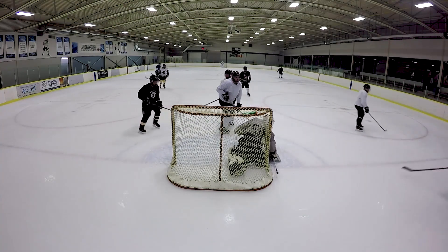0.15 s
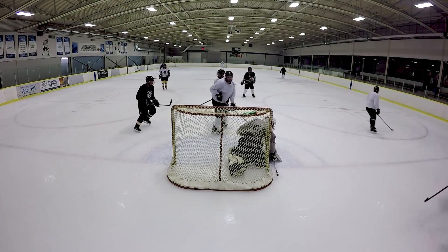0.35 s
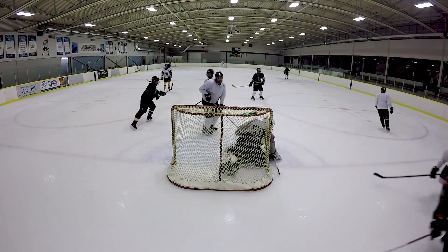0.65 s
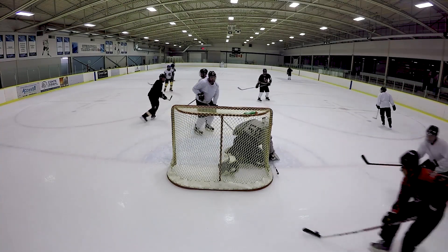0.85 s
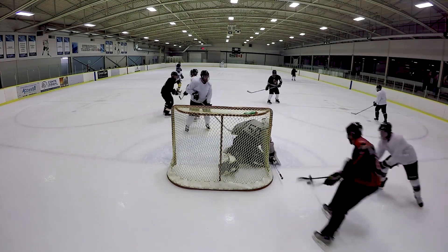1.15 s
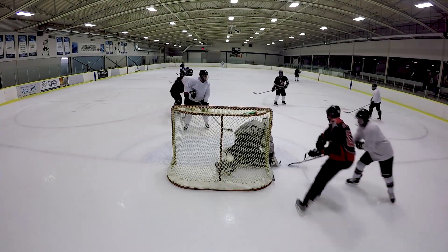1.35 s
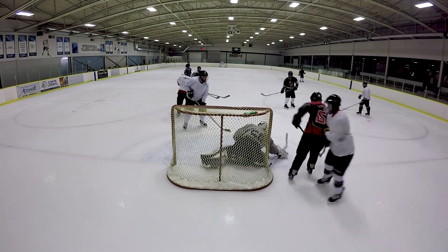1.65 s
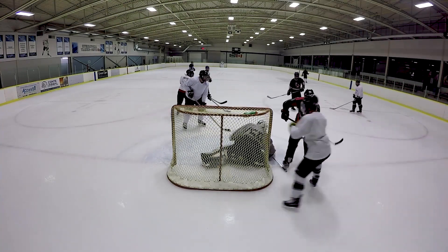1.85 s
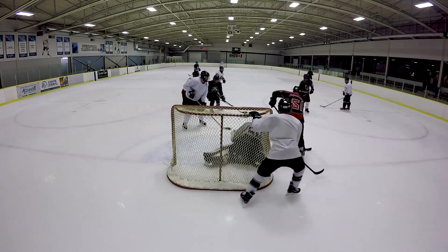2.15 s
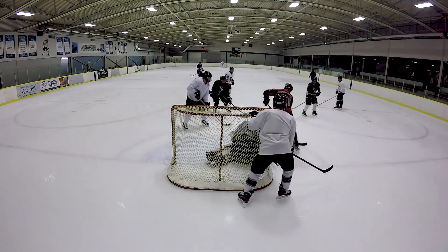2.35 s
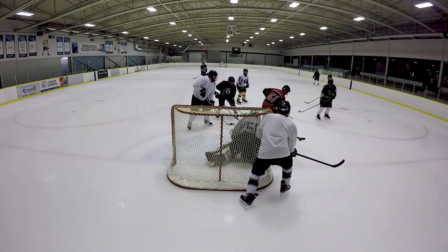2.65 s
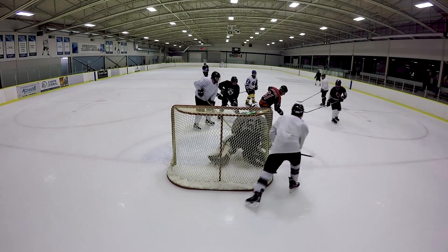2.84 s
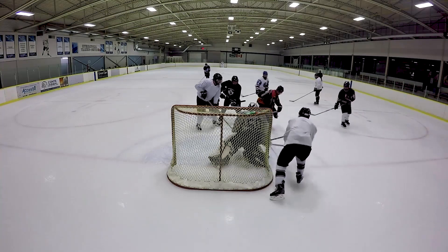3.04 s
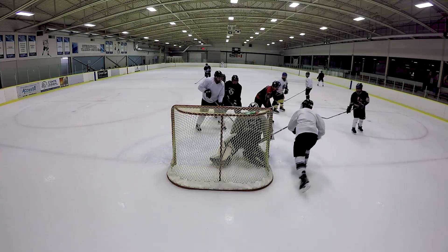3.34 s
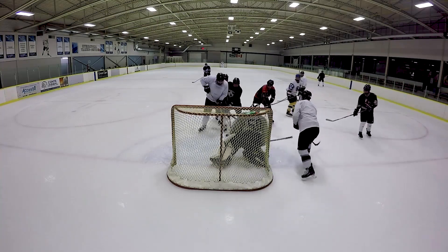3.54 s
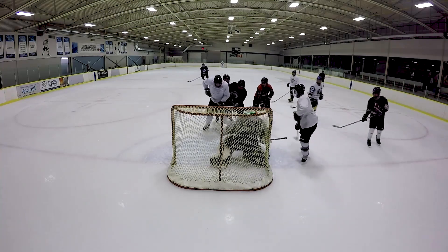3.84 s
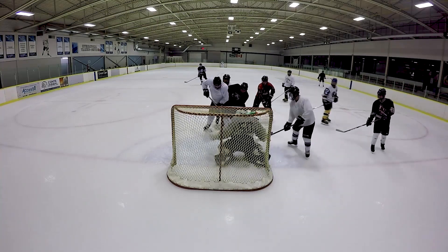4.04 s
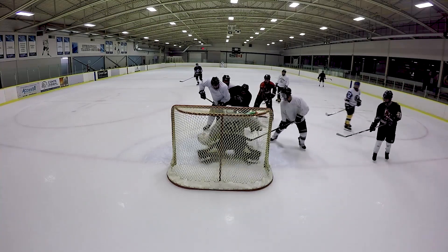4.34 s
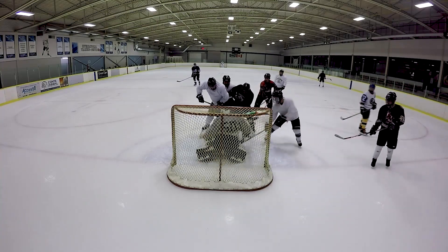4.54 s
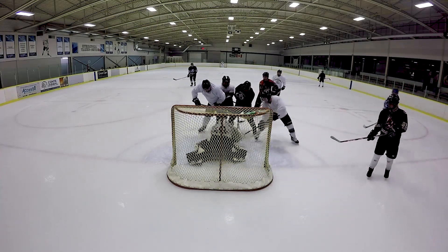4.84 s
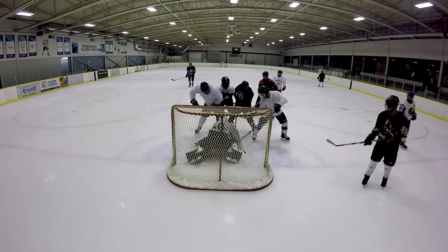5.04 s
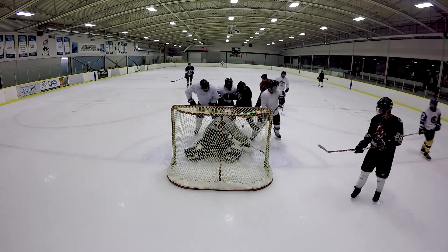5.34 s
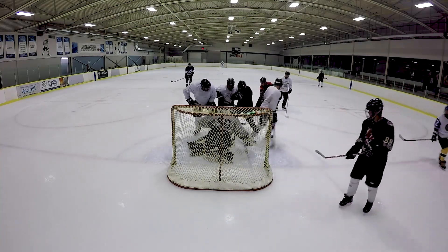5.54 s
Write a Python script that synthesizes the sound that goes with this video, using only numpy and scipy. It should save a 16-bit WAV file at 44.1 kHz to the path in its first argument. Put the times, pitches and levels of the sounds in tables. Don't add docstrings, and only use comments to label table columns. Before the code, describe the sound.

An indoor rink with a low steady ventilation rumble, heard through a small closed case that gives a boxy, nasal colour. From 0 s, blades scrape and hiss on ice, with a solid knock at 0.3 and lighter ones near 0.5. Between 0.6 and 1.2 skaters pass very close: gritty carving, bright snow spray, a low boom in the boards. At 1.2 a stick trails briefly, then a hard dry shot cracks, the loudest event, with a faint buzzing glass tail and hall echo. A sharp stick-on-post clack hits at 1.7, with flat knocks at 1.95 and 2.1 and a tap at 2.25. Close carving fades after about 2.2. A hollow pad chatters at 2.7-2.85; crisp taps follow at 3.0-3.1, rattling knocks at 3.6 and 3.9-4.0. Irregular clacks cluster from 4.1 to 4.6, a drag and soft thumps at 4.8-4.9, then sparse knocks until 5.6 over faint distant skating.

```python
import sys
import numpy as np
from scipy import signal
from scipy.fft import rfft, irfft
from scipy.io import wavfile
from scipy.ndimage import uniform_filter1d

SR = 44100
rng = np.random.default_rng(int(sys.argv[2]) if len(sys.argv) > 2 else 0)


def nominal_scale(level):
    x = np.asarray(level, float) / 20
    return 10 ** x


def generate_wav(sig):
    pcm = np.round(np.clip(np.atleast_2d(sig).T, -1, 1) * 32767).astype(np.int16)
    wavfile.write(sys.argv[1], SR, pcm)


N = 250929

# (frequency [Hz], level [dB per Hz])
PLANT_SPECTRUM = [(7.1, -39), (12, -1), (44, 1), (189, -7.5), (229, -6), (273, -10), (400, -10),
                  (520, -14.5), (880, -120)]
# (time [s], half-width [s], level [dB])
BOARD_BOOM = (0.98, 0.28, 5.7)
RUMBLE_DB, SWAY_DB = -53.5, 1.6
WEIGHT_SHARE = 0.057

# (frequency [Hz], width [Hz], level [dB])
CASE_RESONANCES = [(1036, 95, -9.5), (1680, 340, -4.5), (2560, 444, -1.5), (3435, 340, -6), (3910, 100, -4),
                   (4840, 230, -12.5), (5350, 200, -12), (7460, 14, -38)]
# (frequency [Hz], level [dB])
CASE_LEAK = [(100, -20.5), (300, -17.5), (700, -17.5), (1250, -4.5), (2100, -3), (3050, -23), (4200, -8.5),
             (5500, -13), (7500, -16.5), (11000, -30), (15000, -35.5)]
# (frequency [Hz], width [Hz], level [dB])
CASE_NOTCHES = [(1184, 246, -6), (1814, 167, -5.5), (3156, 280, -2.5), (4152, 540, -6.5), (4950, 170, -2),
                (7730, 2200, -3.5), (12100, 2600, 5.5)]
# (frequency [Hz], time to fall 60 dB [s])
RINK_DECAY = [(200, 1.9), (600, 2.4), (1000, 0.23), (2500, 1.75), (6000, 1.4), (14000, 0.4)]
# (delay [s], level [dB])
RINK_ECHOES = [(.0035, -12.5), (.008, -14), (.024, -14.5), (.038, -12), (.09, -36), (.14, -35)]

# (time [s], level [dB])
FAR_PLAY = [(0.0, -32.5), (0.25, -37.5), (1.12, -35), (1.33, -30.5), (1.5, -36), (1.74, -31.5),
            (1.87, -34.5), (2.26, -34.5), (2.44, -41.5), (3.06, -36), (3.5, -43.5), (3.64, -37.5),
            (3.84, -42.5), (3.98, -36), (4.56, -37.5), (4.72, -38.5), (5.52, -45), (5.69, -40.5)]
# (start [s], push [s], snow level [dB], grind level [dB], hiss pitch [Hz])
NEAR_STRIDES = [(0.0, 0.11, -61.5, -44, 10400), (0.4, 0.16, -69, -40.5, 10200),
                (0.64, .32, -46.5, -38, 11000), (0.95, 0.36, -51, -42.5, 9500),
                (1.24, 0.11, -46.5, -40, 10400), (1.82, 0.21, -47, -45, 11300),
                (1.93, 0.26, -50, -40.5, 11150), (2.62, 0.32, -57, -60, 10140),
                (2.94, 0.13, -51.5, -52, 9900), (3.06, .12, -62, -42, 10100), (3.5, 0.29, -64.5, -62, 9850),
                (4.15, 0.3, -61, -56, 10400), (4.76, 0.15, -69, -41.5, 9990), (5.0, 0.058, -81, -41, 9800),
                (5.52, .2, -61, -54, 9700)]
# (level [dB], share [dB per dB])
IDLE_LAYERS = [
    (-52, 0.49),
    (-67.5, 0.29),
    (-49, 0.51),
]
DIG_S, LIFT_DB_PER_S = 0.19, 100
SAG_HZ_PER_S = 4200
USUAL_DB, NEAREST_DB = -38, -46
SPRAY_DB, SPRAY_SHARE = -40, 0.53
CARVE_DB, CARVE_SHARE = -47, 1

# (time [s], level [dB], frequency [Hz], width [Hz], 60 dB decay [s])
GLASS_BUZZ = (1.29, -30, 2480, 260, 1.5)
# (time [s], peak [dB], pitch [Hz])
PAD_BUMPS = [(0.208, -47, 1060), (2.414, -50, 1000), (2.72, -32, 935), (2.755, -31, 910), (2.786, -26, 940),
             (2.819, -33.5, 875), (2.849, -34, 860), (2.966, -39, 515), (4.259, -38, 980),
             (4.676, -33.5, 1060), (4.812, -33, 700), (3.637, -35, 820), (4.925, -36.5, 667),
             (3.109, -33, 1010)]
# (time [s], peak [dB], pitch [Hz])
BOARD_THUMPS = [(0.87, -46, 35.8), (0.92, -46, 45), (1.223, -38, 48), (1.221, -41, 174), (1.224, -27, 427),
                (3.11, -32, 277), (4.592, -46, 71), (4.811, -38, 453), (4.908, -40.5, 79.8),
                (4.924, -40, 152), (4.927, -31, 390), (4.959, -44, 120), (4.972, -42, 480),
                (4.768, -40, 334)]
# (time [s], peak [dB], pitch [Hz], length [cycles])
POST_CLANG = (1.7183, -6.5, 2200, 6.5)

# (time [s], knock peak [dB], knock
# pitch [Hz], tick level [dB], thud level [dB])
STICK_DRAGS = [(0.9393, -46, 1460, -42, -30), (1.2583, -25, 2530, -52, -41),
               (1.7444, -24, 2480, -33.5, -52), (2.2661, -31, 1740, -33, -49),
               (2.4277, -30, 2460, -42.5, -49), (2.8354, -27, 2630, -55, -44),
               (2.8754, -42, 2360, -61, -49), (4.8135, -24, 3300, -44, -30.5),
               (4.8313, -24, 2410, -47, -55), (4.8462, -26, 2500, -47, -67),
               (5.6397, -29.5, 2800, -52, -35)]
# (time [s], knock peak [dB], knock pitch [Hz], tick level [dB], length [ms])
LIGHT_TAPS = [(0.4512, -33, 2280, -49, 3.4), (0.8603, -23, 2740, -32, 12), (2.2391, -16, 2820, -25, 3.5),
              (2.4515, -23, 2560, -38.5, 6.4), (2.9914, -19.5, 2280, -37, 2.7),
              (3.0313, -11, 2360, -33, 0.59), (3.114, -14, 2500, -36.5, 4.9), (3.512, -32, 1540, -42, 5.3),
              (3.6704, -22, 1640, -46, 9.8), (3.9434, -23, 2500, -50, 8.2), (3.9558, -20, 2500, -39, 5.3),
              (3.9905, -25, 2340, -45, 6), (4.0028, -19.5, 2400, -41, 7.8), (4.4464, -21, 2360, -39, 3.7),
              (4.526, -26, 2460, -53, 3.7), (4.6242, -14, 2370, -36.5, 5.2),
              (4.6756, -29, 1590, -46.5, 3.2), (4.768, -31, 2180, -44, 4.4)]
# (time [s],
# knock peak [dB], knock pitch [Hz], thud level [dB], length [ms])
SHAFT_KNOCKS = [(1.246, -11.5, 2560, -32, 5.2), (1.7187, -10.5, 2600, -27.5, 4.6),
                (1.952, -19, 2550, -44, 7.7), (2.1269, -17.5, 2370, -29, 3.05),
                (3.635, -18, 1810, -42, 7.5), (3.9219, -19, 2000, -31.5, 10), (3.972, -21, 2060, -31.5, 12)]
# (time [s], knock peak [dB], knock
# pitch [Hz], tick level [dB], thud level [dB])
FULL_HITS = [(0.2709, -17.5, 2210, -49, -22), (0.3078, -48, 2480, -50, -32.5),
             (0.4662, -24, 1660, -48, -31), (1.1668, -20, 2460, -35, -25.5),
             (1.2293, -15, 2656, -43, -16.5), (1.6752, -26, 1610, -27.5, -25.5),
             (1.6873, -22, 2500, -34, -28.5), (3.108, -38, 1389, -47, -22.5),
             (4.1087, -17.5, 1790, -72, -25), (4.4129, -16.5, 2200, -76, -34),
             (4.5047, -19, 2580, -31, -28.5), (4.578, -16, 2700, -62, -28), (4.596, -48, 2450, -45, -29),
             (5.0552, -27.5, 2560, -44.5, -44), (5.463, -30, 2540, -49, -37), (5.5988, -18, 1680, -67, -30),
             (5.614, -44, 1520, -47, -47)]
# (time [s], knock peak [dB], knock pitch [Hz], tick level [dB], length [ms])
HARD_SHOT = [
    (1.1843, -27, 2430, -41, 2.4),
    (1.191, -21, 1920, -48, 2.5),
    (1.2223, 0, 2660, -62, 1.24),
    (1.2239, -1.5, 2700, -14.5, 4.8),
]
BLOW_MS, BLOW_HZ, DRAG_MS = 8.7, 2400, 13
TAP_THUD_DB, SHOT_THUD_DB, KNOCK_TICK_DB = -24, -18, -22.5
SHARP, FLAT, SOFT, HARD = 13, 3, 0.3, 6

HISS_DB = -65.5
KNEE = 4
EDGE_HZ = 15290


def evened(x):
    return x / np.sqrt(np.mean(x ** 2) + 1e-20)


def peaked(x):
    return x / (abs(x).max() + 1e-12)


def read(points, hz):
    f, value = np.transpose(points)
    return np.interp(np.log(hz + 1), np.log(f + 1), value)


def along(rows):
    s, *columns = np.transpose(rows)
    return [np.interp(np.arange(N) / SR, s, c) for c in columns]


def add(mix, s, sound):
    part = mix[round(s * SR):][:len(sound)]
    part += sound[:len(part)]


def band(x, lo_hz, hi_hz):
    edges = [max(lo_hz, 10), min(hi_hz, 0.45 * SR)]
    return signal.sosfilt(signal.butter(2, edges, "band", fs=SR, output="sos"), x)


def resonate(x, hz, width_hz):
    turn = np.exp(2j * np.pi * np.cumsum(hz * np.ones(len(x))) / SR)
    r = np.exp(-np.pi * width_hz / SR)
    return 2 * (turn * signal.lfilter([1 - r], [1, -r], x / turn)).real


def wander(hz):
    step = max(int(SR / hz), 1)
    slow = uniform_filter1d(rng.standard_normal(N), step)
    return evened(uniform_filter1d(slow, step))


def causal(gain):
    log_gain = np.log(np.r_[gain, gain[-2:0:-1]] + 1e-5)
    spectrum = np.exp(np.conj(signal.hilbert(log_gain)))
    return np.fft.ifft(spectrum).real[:len(gain) // 2]


def camera_case():
    hz = np.fft.rfftfreq(4096, 1 / SR)
    power = nominal_scale(read(CASE_LEAK, hz)) ** 2
    for centre, width, db in CASE_RESONANCES:
        power = power + nominal_scale(db) ** 2 / (1 + (2 * (hz - centre) / width) ** 4)
    notch_db = sum(db * np.exp(-(2 * (hz - centre) / width) ** 2) for centre, width, db in CASE_NOTCHES)
    return causal(np.sqrt(power) * nominal_scale(notch_db))


def rink(x):
    taps = rng.choice([-1., 1.], 2 * SR) * (rng.random(2 * SR) < 2500 / SR)
    hz, t, z = signal.stft(taps, SR, nperseg=256)
    decay = nominal_scale(-60 * t / read(RINK_DECAY, hz)[:, None])
    build_up = np.clip(t / 0.013, 0, 1)
    tail = signal.istft(z * decay * build_up, SR, nperseg=256)[1]
    tail = nominal_scale(-8.0) * tail / np.linalg.norm(tail)
    for s, db in RINK_ECHOES:
        add(tail, s, np.array([nominal_scale(db)]))
    return band(signal.fftconvolve(x, tail)[:N], 1200, 27000)


def plant():
    z = rfft(rng.standard_normal(N)) * nominal_scale(read(PLANT_SPECTRUM, np.fft.rfftfreq(N, 1 / SR)))
    grind_db = blade_levels()[3]
    weight_db = WEIGHT_SHARE * (grind_db - NEAREST_DB) + SWAY_DB * wander(1.5)
    s, width, db = BOARD_BOOM
    weight_db = weight_db + db * np.exp(-((np.arange(N) / SR - s) / width) ** 2)
    return nominal_scale(RUMBLE_DB + weight_db) * evened(irfft(z, N))


def strides(levels_db, idle_db):
    t, power = np.arange(N) / SR, nominal_scale(idle_db) ** 2
    for (s, push, *_), db in zip(NEAR_STRIDES, levels_db):
        dig = np.clip((t - s) / DIG_S + (s <= 0), 0, 1)
        lift_db = LIFT_DB_PER_S * np.maximum(t - s - push, 0)
        power = power + (dig * nominal_scale(db - lift_db)) ** 2
    return 10 * np.log10(power)


def blade_levels():
    play = along(FAR_PLAY)[0]
    _, _, snow, grind, _ = np.transpose(NEAR_STRIDES)
    spray_db, snow_db, grind_db = (db + share * (play - USUAL_DB) for db, share in IDLE_LAYERS)
    nearness_db = snow - NEAREST_DB
    return (strides(CARVE_DB + CARVE_SHARE * nearness_db, play),
            strides(SPRAY_DB + SPRAY_SHARE * nearness_db, spray_db),
            strides(snow, snow_db), strides(grind, grind_db))


def slide():
    s, push, _, _, hz = np.transpose(NEAR_STRIDES)
    t = np.arange(N) / SR
    latest = np.maximum(np.searchsorted(s, t, side="right") - 1, 0)
    return hz[latest] - SAG_HZ_PER_S * np.clip(t - s[latest], 0, push[latest])


def swish(x, width_hz, lift_db):
    return x + nominal_scale(lift_db) * resonate(x, slide(), width_hz)


def chips(per_s, spread_db, share, shake_db, shake_hz):
    size = nominal_scale(spread_db * np.minimum(rng.exponential(1, N), 4)) * rng.choice([-1., 1.], N)
    share = np.clip(share, 0, 1)
    breaking = evened(size * (rng.random(N) < per_s / SR))
    grit = share * breaking + (1 - share) * rng.standard_normal(N)
    return grit * nominal_scale(shake_db * wander(shake_hz))


def blades(case):
    carve_db, spray_db, snow_db, grind_db = blade_levels()
    carve = band(chips(1500, 5.2, 0.18, 1.55, 74), 1200, 3490)
    spray = band(chips(3000, 1.0, 0.11, 2.1, 51), 2700, 9700)
    spray = spray + 0.27 * resonate(spray, slide() / 2, 240)
    snow = swish(band(chips(3000, 3.5, 0.36, 1.4, 50), 7800, 17000), 800, 6)
    grind = band(chips(400, 1.6, 0.46, 1.7, 22), 314, 1194)
    grind = grind + 0.52 * resonate(grind, 1097, 330)
    layers = ((carve, carve_db - 0.7), (spray, spray_db + 0.1), (snow, snow_db + 0.09), (grind, grind_db + 0.23))
    return sum(nominal_scale(db) * evened(signal.oaconvolve(x, case)[:N]) for x, db in layers)


def pane(s, db, hz, width_hz, t60):
    t = np.arange(SR) / SR
    buzz = resonate(rng.standard_normal(SR), hz, width_hz)
    buzz = resonate(buzz, hz, width_hz)
    return s, nominal_scale(db - 60 * t / t60) * np.minimum(t / 0.0088, 1) * evened(buzz)


def bump(row, turns, lift_db):
    s, db, hz = row
    cycles = np.arange(3000) / SR * hz
    swell = cycles * np.exp(-(cycles / turns) ** 2)
    return s, nominal_scale(db + lift_db) * peaked(np.sin(2 * np.pi * cycles) * swell)


def hit(row, chance, case, crack):
    s, knock_db, hz, tick_db, thud_db, ms = row
    t = np.arange(len(chance)) / SR
    u = t / (max(ms, 0.5) / 1000)
    contact = chance * np.minimum(t / 0.00068, 1) * np.exp(-1.6 * u ** 1.7)
    contact = contact + crack * signal.unit_impulse(len(t), idx=12)
    knock = band(contact, 0.84 * hz, 1.143 * hz)
    knock = knock + 0.73 * band(band(contact, 650, 4430), 590, 5030)
    top_hz = np.clip(9000 * nominal_scale(0.5 * (tick_db - knock_db + 24.5)), 6000, 19000)
    tick = band(contact * np.exp(-0.8 * u), 4190, top_hz)
    thud = band(contact, 367, 1320)
    parts = ((knock, knock_db + 3.0), (tick, tick_db + 12.0), (thud, thud_db + 8.5))
    return s, sum(nominal_scale(db) * peaked(signal.fftconvolve(x, case)[:len(t)]) for x, db in parts)


def blows():
    full = [((*row, BLOW_MS * BLOW_HZ / row[2]), SHARP) for row in FULL_HITS]
    full += [((s, db, hz, tick, db + TAP_THUD_DB, ms), SHARP) for s, db, hz, tick, ms in LIGHT_TAPS]
    full += [((s, db, hz, db + KNOCK_TICK_DB, thud, ms), FLAT) for s, db, hz, thud, ms in SHAFT_KNOCKS]
    full += [((*row, DRAG_MS), SOFT) for row in STICK_DRAGS]
    full += [((s, db, hz, tick, db + SHOT_THUD_DB, ms), HARD) for s, db, hz, tick, ms in HARD_SHOT]
    return full


def scene():
    case, play, rows = camera_case(), np.zeros(N), blows()
    near = blades(case) + plant()
    add(near, *pane(*GLASS_BUZZ))
    for row in BOARD_THUMPS:
        add(near, *bump(row, 0.52, 3.5))
    add(near, *bump(POST_CLANG[:3], POST_CLANG[-1], 0))
    for row in PAD_BUMPS:
        add(play, *bump(row, 2.5, 1.2))
    for (row, crack), chance in zip(rows, rng.standard_normal((len(rows), 2000))):
        add(play, *hit(row, chance, case, crack))
    return (near + play + rink(play))[None]


def low_pass(x):
    return signal.sosfilt(signal.butter(12, 16490, fs=SR, output="sos"), x)


def record(dry):
    dry = dry + nominal_scale(HISS_DB) * rng.standard_normal(dry.shape)
    dry = dry / (1 + abs(dry) ** KNEE) ** (1 / KNEE)
    edge = signal.firwin(1023, EDGE_HZ, window=("kaiser", 9), fs=SR)
    low = signal.oaconvolve(dry, edge[None], "same")
    mix = low + nominal_scale(-38) * (dry - low)
    return low_pass(mix)


dry = scene()
out = record(dry)
generate_wav(out)
```